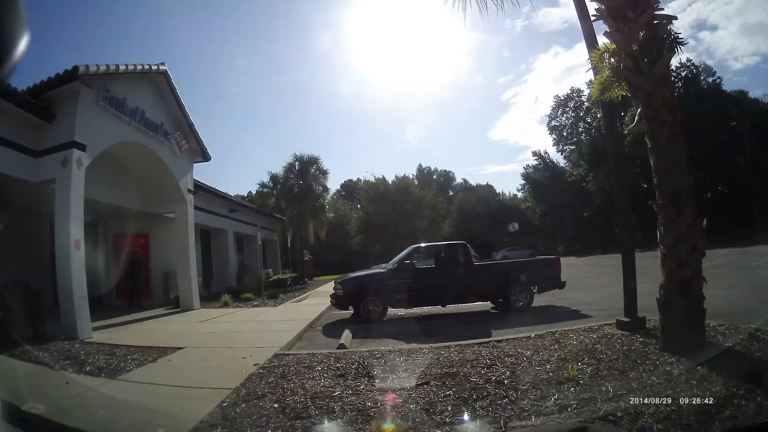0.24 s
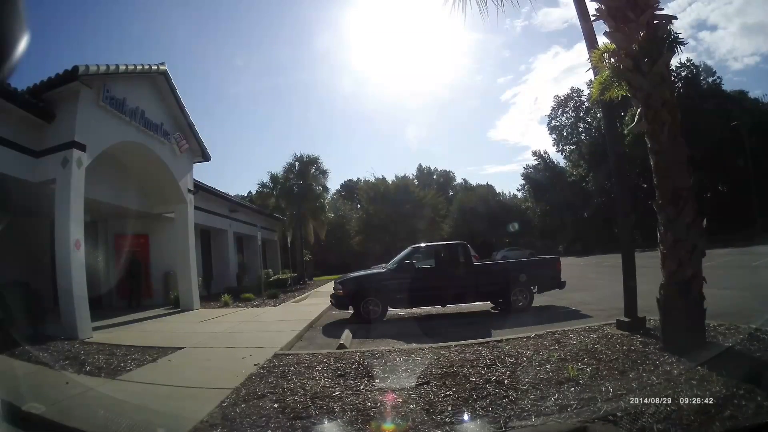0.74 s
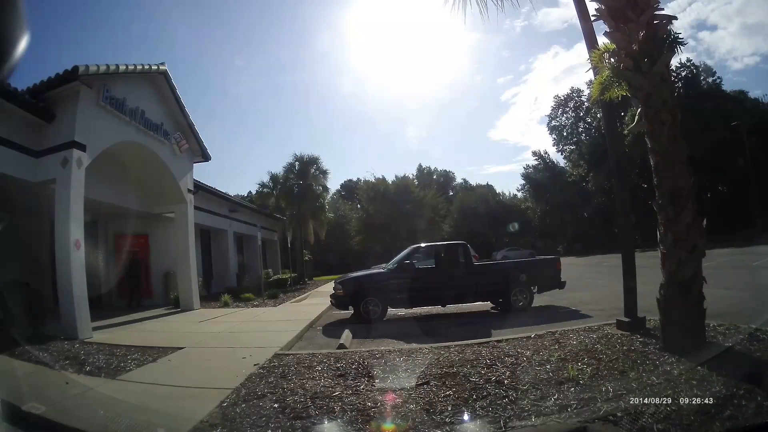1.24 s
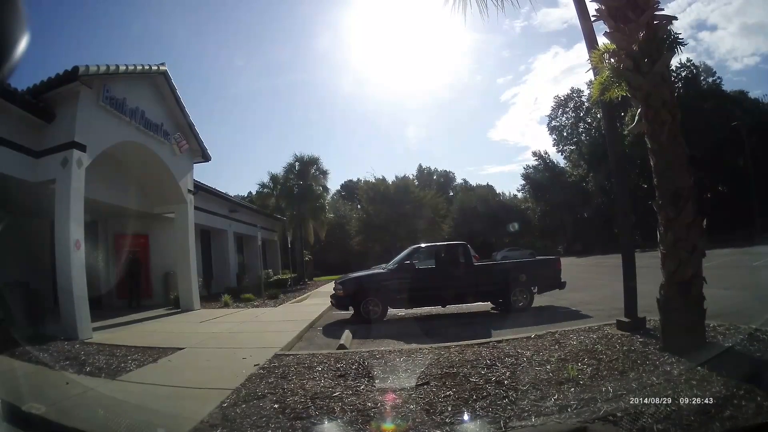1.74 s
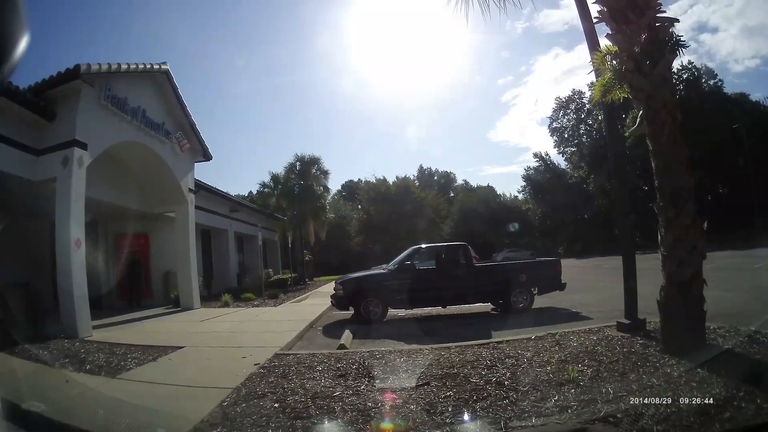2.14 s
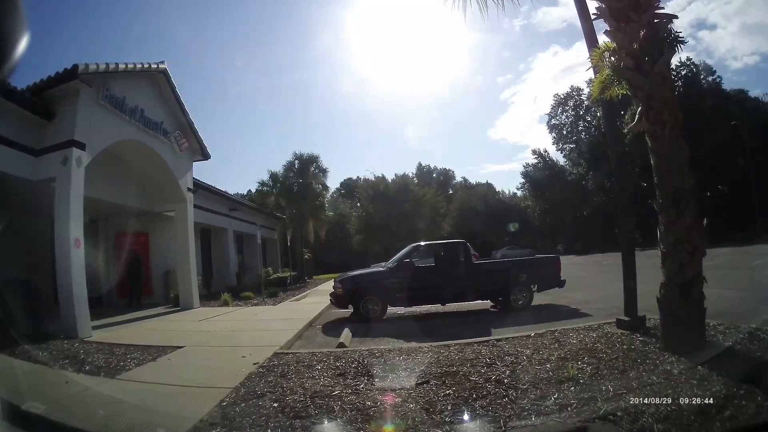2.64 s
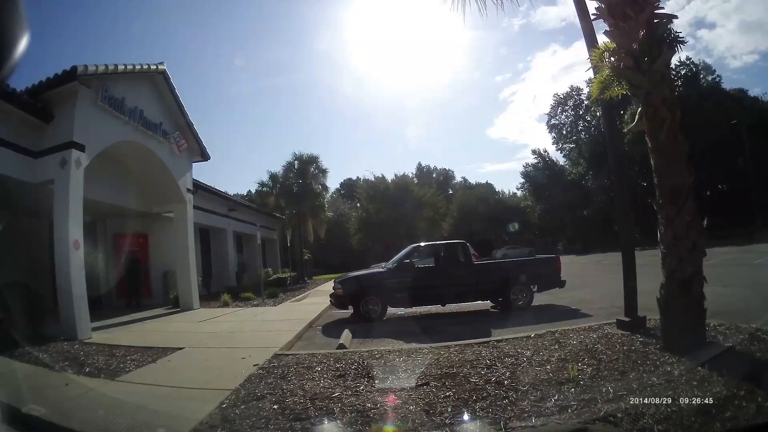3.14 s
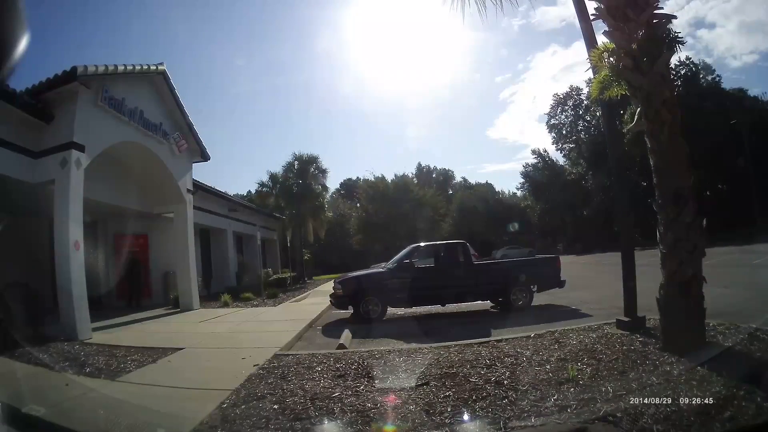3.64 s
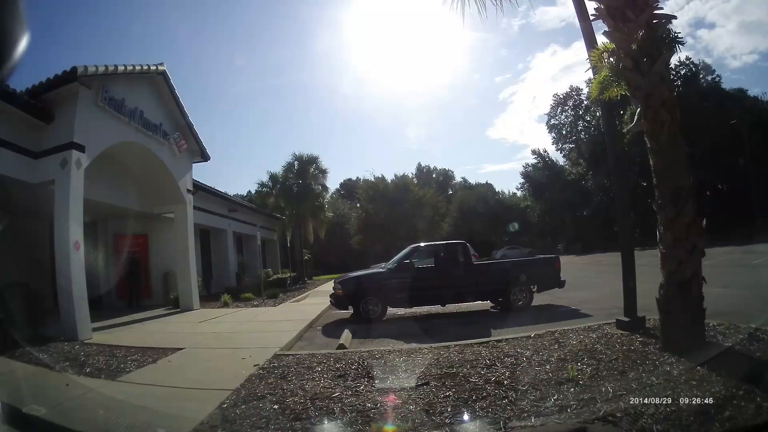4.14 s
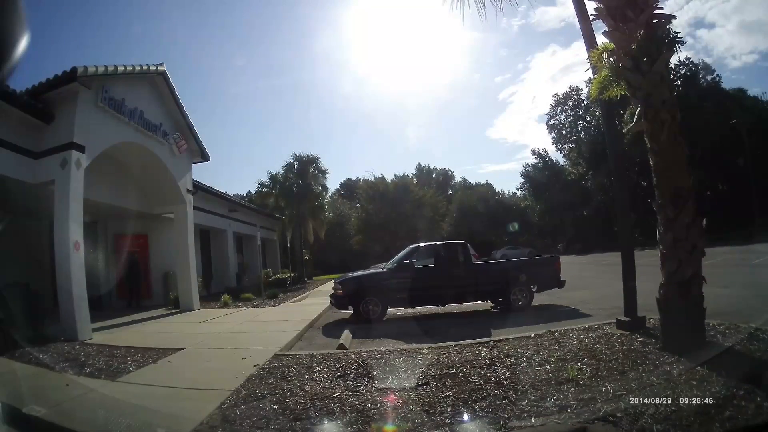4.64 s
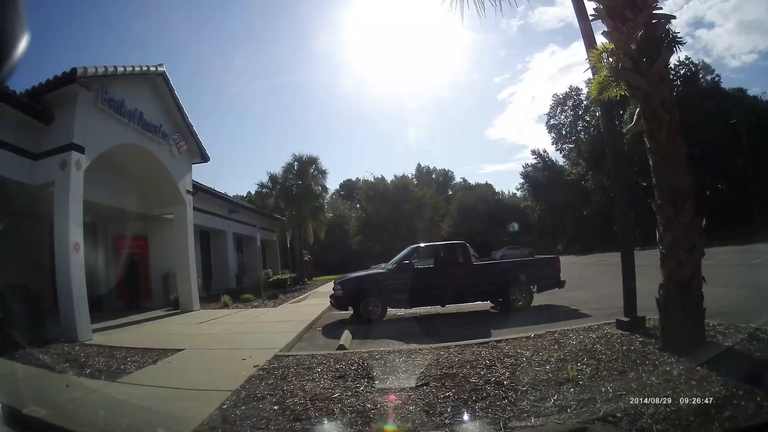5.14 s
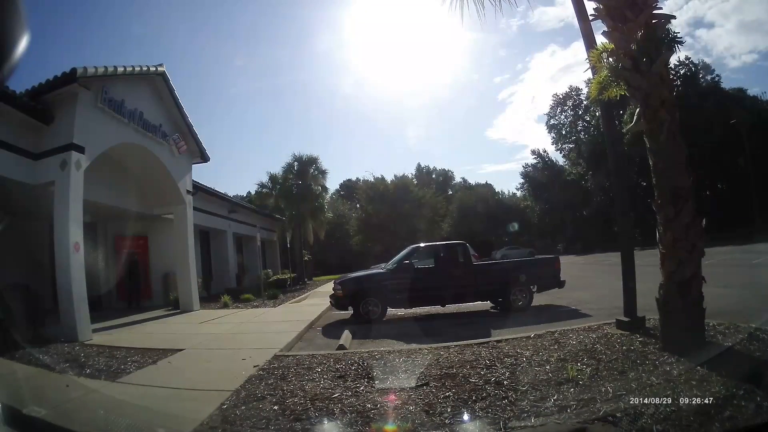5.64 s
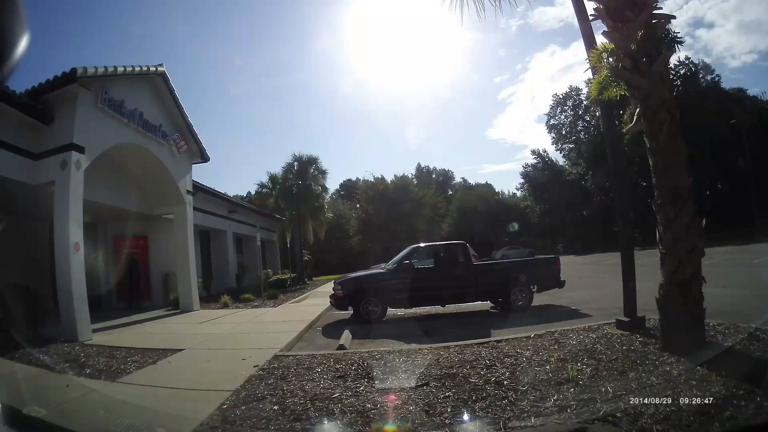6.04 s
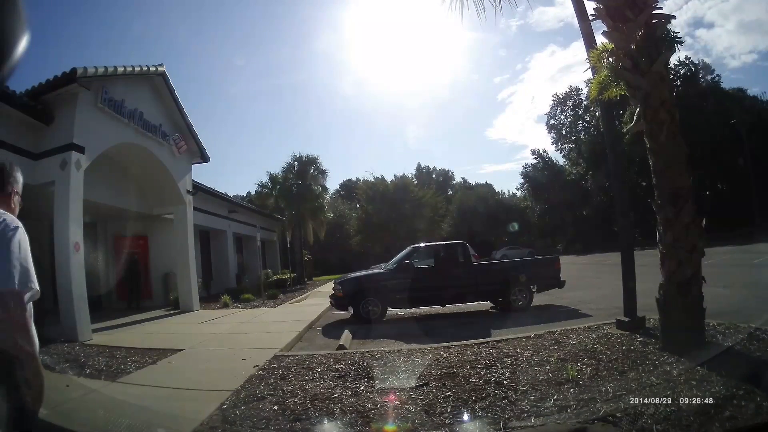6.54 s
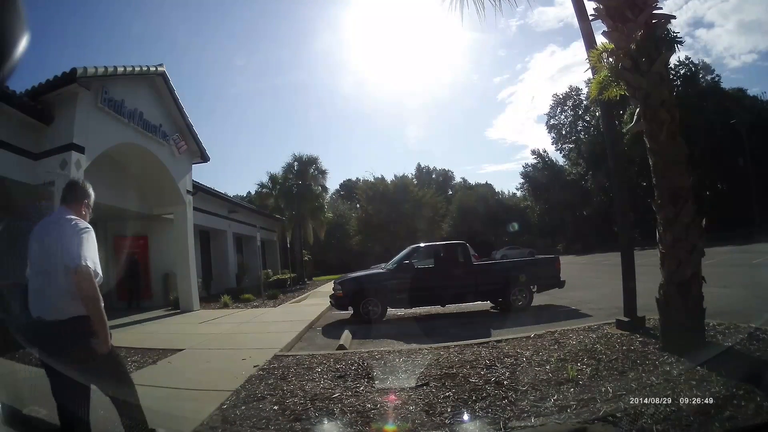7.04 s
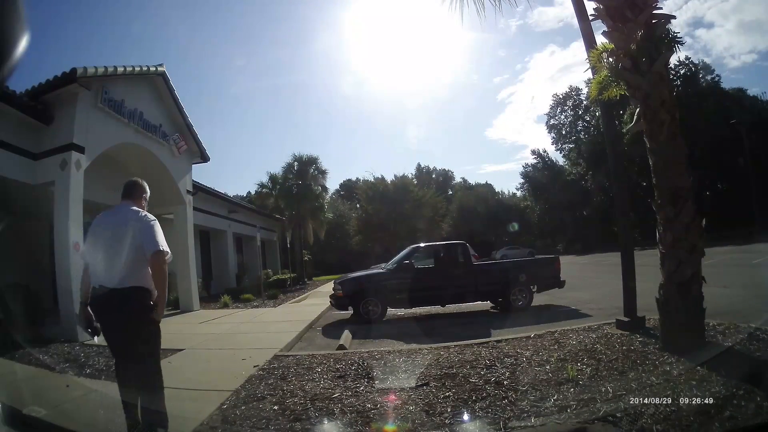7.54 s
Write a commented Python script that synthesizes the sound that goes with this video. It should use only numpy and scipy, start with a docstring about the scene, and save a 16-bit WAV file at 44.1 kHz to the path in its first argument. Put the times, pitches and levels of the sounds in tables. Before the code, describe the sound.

Close, dry interior of a small parked car, heard at the windscreen. From 0 to 0.85 s a low engine hum dies away under a light knock, dry clicks and faint high key jingles. Between 0.9 and 1.45 s hard trim knocks and padded thuds crowd together, with scuffing, a tiny squeak at 1.1 and the strongest knock near 1.3. Cloth rustles and low body sway continue; a knock lands at 1.9, a cluster at 2.7-3.0, a thud at 3.3, then soft drags around 3.8 and a small tap at 4.3. At 4.8 s the door slams: very loud crack, deep boom, shaking panels and brief glass rattle, dying within about half a second. Distant traffic becomes duller. Weak knocks at 5.4, 5.65 and 5.9 thin out to barely audible taps by 6.8. Until about 7.8 s, faint hiss, thin whine and soft irregular low electrical pulses remain.

```python
"""Leaving a parked car

Inside a small car, at a camera on the windscreen: the engine's shudder dies away, keys jingle, the driver knocks
the trim while climbing out and slams the door, which dulls the traffic; faint knocks follow.
Blows are short noise bursts through resonances; rubbing, seat and traffic are shaped noise; keys are decaying sines.
The camera adds hiss, a thin whine and soft supply pulses, and limits the peaks."""
import sys
import numpy as np
from scipy import signal
from scipy.fft import rfft, irfft, next_fast_len
from scipy.io import wavfile
from scipy.ndimage import uniform_filter1d, map_coordinates

SR = 44100
rng = np.random.default_rng(int(sys.argv[2]) if len(sys.argv) > 2 else 0)


def dump(signal):
    """Clip the signal to [-1, 1] and save it as 16-bit WAV at the path in sys.argv[1]."""
    limited = np.clip(np.atleast_2d(signal).T, -1, 1)
    pcm = np.round(limited * 32767).astype(np.int16)
    wavfile.write(sys.argv[1], SR, pcm)


N = 343539
SLAM_S = 4.826

# trim panel resonances: f/Hz, width/Hz, level/dB
TRIM_MODES = [(170, 110, -9.5), (293, 46, -0.5), (398, 48, 2.5), (602, 62, 1), (822, 61, 1), (964, 54, 2),
              (1230, 184, 0), (1510, 370, -4.5), (1763, 330, -10.5)]
# resonances of small stiff parts: f/Hz, width/Hz, level/dB
EDGE_MODES = [(2530, 1200, 9.5), (2830, 310, 8.5)]


def amp(db):
    """Decibels to gain."""
    return 10 ** (np.asarray(db) / 20)


def unit(x):
    """x at rms 1."""
    return x / np.sqrt(np.mean(x ** 2) + 1e-20)


def curves(rows, outside=None):
    """One value per sample for each column after the time."""
    s, *cols = np.transpose(rows)
    return [np.interp(np.arange(N) / SR, s, c, outside, outside) for c in cols]


def wobble(rate_hz):
    """Smooth random curve through rate_hz random knots a second."""
    knots = rng.standard_normal(int(N * rate_hz / SR) + 4)
    return map_coordinates(knots, [np.arange(N) * rate_hz / SR])


def filtered(x, response):
    """x through a complex response of frequency."""
    m = next_fast_len(2 * len(x))
    return irfft(rfft(x, m) * response(np.fft.rfftfreq(m, 1 / SR)), m)[:len(x)]


def ringing(modes, scatter_db):
    """Sum of resonant band-passes of alternating sign, each strength scattered at random."""
    gains = amp(scatter_db * rng.standard_normal(len(modes)))

    def response(f):
        total = 0
        for k, (hz, width_hz, db) in enumerate(modes):
            band = 1j * f * width_hz / (hz * hz - f * f + 1j * f * width_hz)
            total = total + (-1) ** k * gains[k] * amp(db) * band
        return total
    return response


def shelf(hz, db, order=3):
    """Changes the level above hz by db."""
    return lambda f: ((1 + amp(db / order) * 1j * f / hz) / (1 + 1j * f / hz)) ** order


def soft(hz, order=4):
    """Low-pass: a padded contact loses what lies above hz."""
    return lambda f: (1 + 1j * f / hz) ** -order


def rush(spectrum):
    """Noise of rms 1 with the given spectrum and faint patches of random gain in time and frequency."""
    z = signal.stft(rng.standard_normal(N + 512), nperseg=512)[2]
    field = uniform_filter1d(rng.standard_normal(z.shape), size=8, axis=0)
    field = uniform_filter1d(field, size=10, axis=1)
    noise = signal.istft(z * amp(1.2 * unit(field)), nperseg=512)[1][:N]
    f, db = np.transpose(spectrum)
    return unit(filtered(noise, lambda hz: amp(np.interp(np.log(hz + 1), np.log(f + 1), db))))


def blow(t60_s, kick, rise_s):
    """A one-sample push followed by the cabin's dying scatter."""
    t = np.arange(SR // 4) / SR
    scatter = rng.standard_normal(len(t)) * amp(-60 * t / t60_s) * (1 - np.exp(-t / rise_s))
    scatter[0] = kick
    return scatter


def add(track, s, sound, db):
    """Mixes a sound in at time s with its peak at db."""
    i = round(s * SR)
    track[i:i + len(sound)] += amp(db) * sound[:N - i] / np.abs(sound).max()


def shake(db, rise_s, t60_s):
    """Gain that climbs 60 dB per rise_s to the slam and falls 60 dB per t60_s after it."""
    t = np.arange(N) / SR - SLAM_S
    return amp(db + np.maximum(60 * np.minimum(t / rise_s, -t / t60_s), -200))


def door():
    """The slam: air booms until leaked out, low tones, shaking glass, panels, floor; one low swing at 1.112 s."""
    # slow swings, and a harder 76 Hz overtone of the overloaded boom: t/s, f/Hz, peak level/dB, t60/s, rise/s
    low_tone_rows = [(4.852, 24.6, -15, .95, .05), (5.144, 26.8, -30, .55, .03),
                     (4.8495, 76, -9.5, .2, .01), (4.838, 44, -14, .3, .01), (1.112, 38, -12, .14, .002)]
    # door skin, colours its shaking: f/Hz, width/Hz, level/dB
    skin_modes = [(567, 290, -5.5), (1239, 1600, -13)]
    out, t = np.zeros(N), np.arange(SR) / SR
    boom = np.sin(2 * np.pi * 25.4 * t) * amp(-60 * (t / .275) ** 4) * (1 - np.exp(-t / .025))
    add(out, 4.823, boom, -5.2)
    add(out, 4.8, np.hanning(round(.045 * SR)), -10)  # air squeezed just before the latch meets
    for s, hz, db, t60_s, rise_s in low_tone_rows:
        add(out, s, np.sin(2 * np.pi * hz * t) * amp(-60 * t / t60_s) * (1 - np.exp(-t / rise_s)), db)

    glass_still_s, glass_fade_s = 0.09, 0.0039  # the pane has seated itself this long after the slam
    loose = np.clip((SLAM_S + glass_still_s - np.arange(N) / SR) / glass_fade_s, 0, 1)
    rattle = rush([(1500, -21.0), (2500, -3.5), (7000, -10.0), (15000, -25.0)])
    glass = unit(amp(5.2 * wobble(300)) * rattle)
    skin = unit(filtered(panels(), ringing(skin_modes, scatter_db=1)))
    floor = rush([(30, -16.5), (50, 11), (100, 4.5), (300, -7.5), (700, -57.0)])
    out += shake(-39.5, rise_s=.02, t60_s=.6) * loose * glass
    out += shake(-14.5, rise_s=.033, t60_s=.37) * skin
    return out + shake(-10.5, rise_s=.039, t60_s=.55) * floor


def struck(modes):
    """Modes as one blow finds them: widened by the striking hand or foot, each a little off its pitch."""
    detune_share, damping = .05, 1.23
    return [(hz * (1 + detune_share * rng.standard_normal()), damping * width_hz, db)
            for hz, width_hz, db in modes]


def knocks():
    """Each blow rings the trim panels and the small stiff parts."""
    # blows on the trim: t/s, panel peak level/dB, stiff-part level re panel/dB
    knock_rows = [(0.1003, -14.5, -7), (0.155, -32, -33), (0.25, -30, 2), (0.893, -11, -43),
                  (0.9166, -15.5, -3.5), (0.932, -7, -22), (0.9675, -10, -12), (1.011, -16, -12),
                  (1.061, -24, -13), (1.083, -23, -32), (1.134, -8.5, -29), (1.182, -26, -18),
                  (1.285, -2, -7.5), (1.379, -26.5, 2.5), (1.429, -26, -13), (1.9003, -11.5, -35),
                  (2.141, -30, -5), (2.746, -13, -24), (2.798, -8, -20.5), (2.858, -18.5, -15),
                  (2.868, -14, -25), (2.979, -24.5, -34), (3.305, -22.5, -31), (3.428, -29.5, -13.5),
                  (4.266, -31.5, -17), (4.812, -6.5, -20.5), (4.828, -1, -23.5), (4.863, -14, -19),
                  (4.913, -11, -48), (4.949, -21, -33), (5.371, -30.5, -35), (5.628, -27, -9),
                  (5.657, -23.5, -19), (5.736, -29.5, -46), (5.878, -32.5, -23), (6.021, -36.5, -23.5),
                  (6.111, -36.5, -42), (6.472, -34.5, -53), (6.838, -38.5, -38)]
    usual_edge_db = -21  # the trim brightens dB for dB with edge above this
    out = np.zeros(N)
    for s, db, edge_db in knock_rows:
        push = blow(.055, kick=13, rise_s=.001)
        trim = ringing(struck(TRIM_MODES), scatter_db=3)
        edge = ringing(EDGE_MODES, scatter_db=3)
        bright = shelf(700, edge_db - usual_edge_db)
        add(out, s, filtered(push, lambda f: trim(f) * bright(f) * soft(3000)(f)), db)
        add(out, s, filtered(push, lambda f: edge(f) * soft(6000)(f)), db + edge_db)
    return out


def thuds():
    """Padded blows: a rough ring at the pitch of the floor, sill, seat frame or door part hit."""
    # blows: t/s, peak level/dB, pitch/Hz
    thud_rows = [(0.895, -27, 178), (0.931, -24, 155), (1.063, -24.5, 137), (1.114, -15.5, 119),
                 (1.284, -10, 139), (1.9004, -13.5, 171), (2.674, -22, 171), (2.746, -24.5, 155),
                 (2.92, -22.5, 254), (5.372, -38, 316), (5.67, -29.5, 164), (6.025, -40, 156),
                 (1.1265, -8, 620), (3.303, -17, 894), (4.811, -4, 603), (4.828, -7, 554),
                 (4.895, -9.5, 520)]
    # modes of the part: f/pitch, width/pitch, level/dB
    part_modes = [(1, 0.18, 5), (1.7, 1, -10.5)]
    scatter_cycles = 30  # t60 in periods of the pitch
    out = np.zeros(N)
    for s, db, pitch_hz in thud_rows:
        modes = [(k * pitch_hz, share * pitch_hz, level) for k, share, level in part_modes]
        part = ringing(modes, scatter_db=2)
        push = blow(scatter_cycles / pitch_hz, kick=16.0, rise_s=0.0016)
        add(out, s, filtered(push, lambda f: part(f) * soft(1200)(f)), db)
    return out


def clicks():
    """Dry broad snaps of keys, buckle and latch; the tilt sets how hard and small the contact is."""
    # contacts: t/s, peak level/dB, treble tilt/dB
    click_rows = [(0.0316, -42, -10), (0.066, -39, -23), (0.251, -26.5, 1), (0.386, -34.5, 1),
                  (0.405, -34, 18), (0.436, -23, 18), (0.488, -41, -6), (0.5108, -38.5, -13),
                  (0.5744, -42.5, -18), (0.656, -32.5, -5), (0.7862, -38.5, -20), (0.8939, -22.5, 8),
                  (0.9314, -21.5, -25), (0.9677, -23.5, -24), (1.0625, -38, -3), (1.1204, -38.5, -10),
                  (1.282, -26, -25), (1.3815, -34.5, -4), (1.43, -40, -10), (1.8068, -39.5, -10),
                  (2.045, -38, -31), (2.11, -33.5, -35), (2.141, -40.5, 15), (2.1894, -54, -10),
                  (2.2054, -41, -32), (2.4182, -45.5, -12), (2.7973, -34, -45), (2.921, -35.5, -6),
                  (2.989, -40.5, -32), (3.1953, -48, 13), (3.4286, -51, -25), (3.4424, -48, -22),
                  (3.474, -44.5, -16), (4.2667, -45, -35), (4.826, -18.5, -33), (4.9042, -30.5, -9),
                  (5.875, -46, -40)]
    # snap resonances: f/Hz, width/Hz, level/dB
    snap_modes = [(2600, 490, 7), (4660, 440, 5.5), (5870, 1000, 2), (9300, 2900, -4.5), (13000, 6500, -13)]
    out = np.zeros(N)
    for s, db, tilt_db in click_rows:
        snap = ringing(snap_modes, scatter_db=2.5)
        push = blow(0.071, kick=0.68, rise_s=0.00017)
        add(out, s, filtered(push, lambda f: snap(f) * shelf(8000, tilt_db)(f)), db)
    return out


def keys():
    """Short pure rings of thin metal; the keys not struck stir weakly and unevenly."""
    # keys touching: t/s, struck key/index, peak level/dB
    jingle_rows = [(.29, 1, -58), (.364, 3, -63), (.405, 1, -50), (.488, 3, -64), (.657, 4, -57),
                   (.67, 1, -55), (.802, 1, -53), (.943, 0, -48), (.952, 3, -59), (.98, 2, -55),
                   (.985, 4, -58), (1.39, 3, -59)]
    # pitch of each key: f/Hz
    key_hz = [7000, 9560, 10500, 12600, 14080]
    t60_s, neighbours_db = .08, -16
    out, t = np.zeros(N), np.arange(SR // 8) / SR
    for s, key, db in jingle_rows:
        others_db = neighbours_db + 4 * rng.standard_normal(len(key_hz))
        levels_db = np.where(np.arange(len(key_hz)) == key, 0, others_db)
        ring = sum(amp(level) * np.sin(2 * np.pi * hz * t) for hz, level in zip(key_hz, levels_db))
        add(out, s, ring * amp(-60 * t / t60_s) * (1 - np.exp(-t / .002)), db)
    return out


def squeak():
    """Hinge or seal lets go: a brief rough stick-slip tone, harmonics on a jittered phase."""
    # harmonics: f/pitch, level/dB
    harmonics = [(2, 2), (3, 11), (4, 4)]
    start_s, length_s, pitch_hz, peak_db = 1.082, .022, 1325, -36
    t = np.arange(round(length_s * SR)) / SR
    phase = 2 * np.pi * pitch_hz * t + 0.34 * wobble(400)[:len(t)]
    tone = sum(amp(db) * np.sin(k * phase) for k, db in harmonics)
    out = np.zeros(N)
    add(out, start_s, np.sqrt(np.hanning(len(t))) * tone, peak_db)
    return out


def panels():
    """Grainy noise in the trim's resonances, rms 1."""
    trim, edge = ringing(TRIM_MODES, scatter_db=0), ringing(EDGE_MODES, scatter_db=0)
    grain = amp(2.65 * wobble(70)) * rng.standard_normal(N)
    return unit(filtered(grain, lambda f: (trim(f) + amp(-25.0) * edge(f)) * soft(3500)(f)))


def rubbed(x):
    """x in the resonances of rubbing, rms 1."""
    # rubbing as the cabin colours it: f/Hz, width/Hz, level/dB
    rub_modes = [(1070, 660, 12), (2500, 440, -3.5), (4300, 560, -6.5), (6000, 500, -6.5),
                 (9800, 6000, -15.5)]
    resonances = ringing(rub_modes, scatter_db=0)
    return unit(filtered(x, lambda f: resonances(f) * soft(12000, order=2)(f)))


def crackle(rate_hz):
    """Sparse random snaps of uneven size, rms 1."""
    sizes_db = 3 * np.minimum(rng.exponential(size=N), 3)
    spikes = (rng.random(N) < rate_hz / SR) * amp(sizes_db)
    return rubbed(signal.fftconvolve(spikes, blow(.03, kick=3, rise_s=.0005))[:N])


def scuffs():
    """Running noise dies away, then drags swell and fade: each mixes panel noise with gritty hiss."""
    # drags over seat and sill, door seal closing; the first row is running noise dying away:
    # start/s, length/s, panel level/dB, hiss level/dB
    scuff_rows = [(-.06, 0.24, -36.5, -51), (0.869, 0.2, -35.5, -39), (1.056, 0.062, -30, -52),
                  (1.112, 0.052, -20.5, -58), (1.134, 0.11, -31, -52), (1.236, 0.11, -36, -56),
                  (1.743, 0.12, -35, -50), (2.308, 0.29, -42.5, -63), (2.55, 0.59, -42.5, -60.5),
                  (3.713, 0.13, -41.5, -56), (3.791, 0.087, -38, -51), (4.744, 0.14, -32, -60),
                  (5.606, 0.046, -35.5, -52), (5.632, 0.084, -37, -58)]
    t, dull, bright = np.arange(N) / SR, np.zeros(N), np.zeros(N)
    for s, length_s, dull_db, bright_db in scuff_rows:
        swell = np.abs(np.sin(np.pi * np.clip((t - s) / length_s, 0, 1))) ** 1.5
        dull += amp(dull_db) * swell
        bright += amp(bright_db) * swell
    hiss = rubbed(amp(3 * wobble(90)) * rng.standard_normal(N))
    grit = amp(-2.5) * crackle(240)
    return dull * panels() + bright * (hiss + grit)


def engine():
    """The body hums at one low order of the stopping engine, unsteady in strength."""
    # hum: t/s, f/Hz, rms level/dB
    shudder_rows = [(0.0, 56.14, -41), (0.5, 56.7, -41.5), (0.85, 51.2, -55)]
    hz, db = curves(shudder_rows)[0], curves(shudder_rows, -120)[1]
    return np.sqrt(2) * amp(db + 1.5 * wobble(11)) * np.sin(2 * np.pi * np.cumsum(hz) / SR)


def cloth():
    """Clothes and belt rubbing: unsteady noise and tiny snaps in the rubbing resonances."""
    # rubbing: t/s, level/dB
    cloth_rows = [(.1, -86), (.3, -47.5), (.55, -56), (1.1, -52), (1.45, -56), (2.3, -53.5), (2.6, -58),
                  (3.2, -60), (3.7, -69.5)]
    rub = rubbed(amp(2.5 * wobble(70) + 2.5 * wobble(14)) * rng.standard_normal(N))
    return amp(curves(cloth_rows, -120)[0]) * (rub + amp(-6) * crackle(90))


def cabin():
    """Low noise of body sway and seat as the driver's weight shifts and the car settles."""
    # weight shifts: t/s, body sway level/dB, seat and floor level/dB
    room_rows = [(0, -45, -52), (.88, -46, -49.5), (1.36, -36.5, -43), (2.55, -35.5, -42.5),
                 (3.1, -40.5, -48.5), (4.75, -41.5, -50), (5.3, -43.5, -55), (5.8, -49.5, -51.5),
                 (6.3, -49.5, -57), (7.79, -53.5, -57)]
    # sway spectrum: f/Hz, relative level per Hz/dB
    sway_spectrum = [(12, -11.5), (48, -1.5), (61, -1.5), (86, -18.5), (140, -42.5), (240, -120)]
    # seat spectrum: f/Hz, relative level per Hz/dB
    seat_spectrum = [(47, -39.5), (80, -5), (168, -5), (308, -12.5), (600, -17.5), (780, -48), (1320, -120)]
    sway_db, seat_db = curves(room_rows)
    sway = amp(sway_db + 0.56 * wobble(7.3)) * rush(sway_spectrum)
    seat = amp(seat_db) * unit(amp(2 * wobble(25)) * rush(seat_spectrum))
    return sway + seat


def traffic():
    """Shaped noise through the door, drifting in level; it drops as the seal closes."""
    # spectrum: f/Hz, relative level per Hz/dB
    traffic_spectrum = [(240, -45.5), (400, -5), (477, -28), (605, -6.5), (698, 0), (1150, 3), (3000, -31),
                        (3900, -94.5)]
    open_db, shut_db, seal_s = -51.5, -63, 0.13
    db = np.interp(np.arange(N) / SR, [SLAM_S - seal_s, SLAM_S], [open_db, shut_db])
    return amp(db + wobble(2.9)) * rush(traffic_spectrum)


def supply():
    """Camera supply sags while it stores data: a step down and up, soft buzz between, steady offset blocked."""
    # long sags: start/s
    long_starts = [5.338, 6.098, 6.438, 6.7, 6.966, 7.248, 7.508, 7.767]
    # short sags: start/s
    short_starts = [5.836, 5.966, 6.267, 6.546, 6.807, 7.066, 7.366, 7.639]
    # buzz: f/Hz, width/Hz, level/dB
    buzz_modes = [(185, 126, -3.5), (432, 76, 4), (1657, 310, -10)]
    long_s, short_s = .033, .0105
    t, sag = np.arange(N) / SR, np.zeros(N)
    for starts, length_s in [(long_starts, long_s), (short_starts, short_s)]:
        for s in starts:
            sag += (t >= s) * (t < s + length_s)
    steps = filtered(-sag, lambda f: 1j * f / (35 + 1j * f) * soft(500, order=2)(f))
    resonances = ringing(buzz_modes, scatter_db=0)
    buzz = unit(filtered(rng.standard_normal(N), lambda f: resonances(f) * soft(4000)(f)))
    return amp(-36.0) * steps + amp(-54.5) * uniform_filter1d(sag, size=100) * buzz


def scene():
    """All sources at the one microphone."""
    events = door() + knocks() + thuds() + clicks() + keys() + squeak() + scuffs()
    return (events + engine() + cloth() + cabin() + traffic())[None]


def record(dry):
    """Camera: adds hiss, whine and supply sags, limits near full scale, cuts all above its band limit."""
    # hiss spectrum: f/Hz, relative level per Hz/dB
    hiss_spectrum = [(880, -50), (1500, -3.5), (5010, -8.5), (15600, -12)]
    # whine: f/Hz, rms level/dB
    whine_rows = [(7881, -77.5)]
    hiss_db, limit, top_hz = -68.5, .98, 15600
    (hz, db), = whine_rows
    whine = np.sqrt(2) * amp(db) * np.sin(2 * np.pi * hz * np.arange(N) / SR)
    x = dry[0] + amp(hiss_db) * rush(hiss_spectrum) + whine + supply()
    x = x / (1 + np.abs(x / limit) ** 16) ** (1 / 16)
    return filtered(x, lambda f: f < top_hz)[None]


dry = scene()
out = record(dry)
dump(out)
```